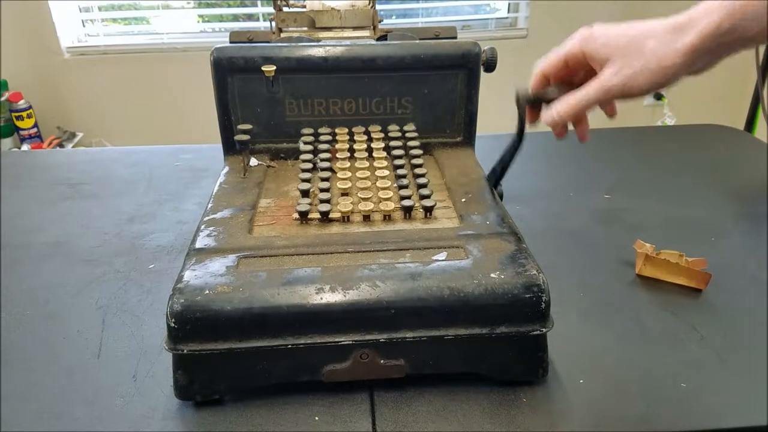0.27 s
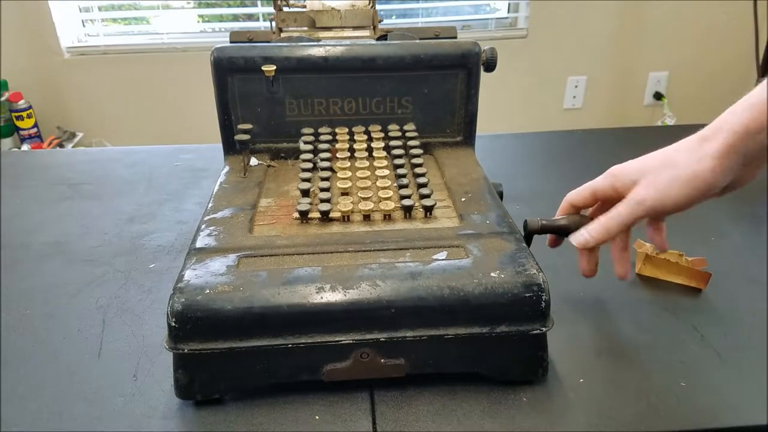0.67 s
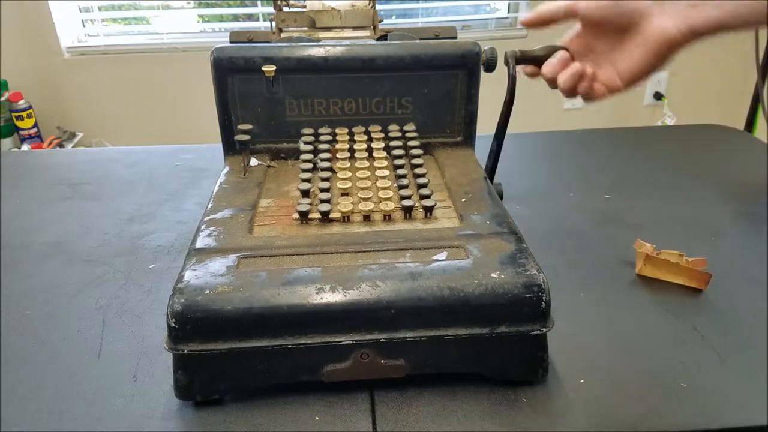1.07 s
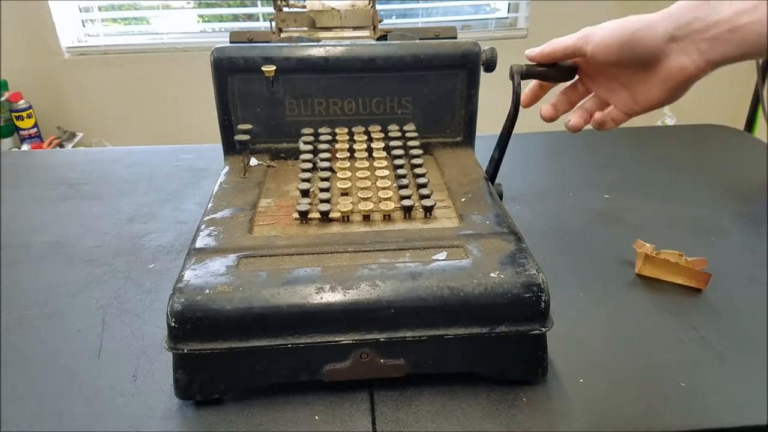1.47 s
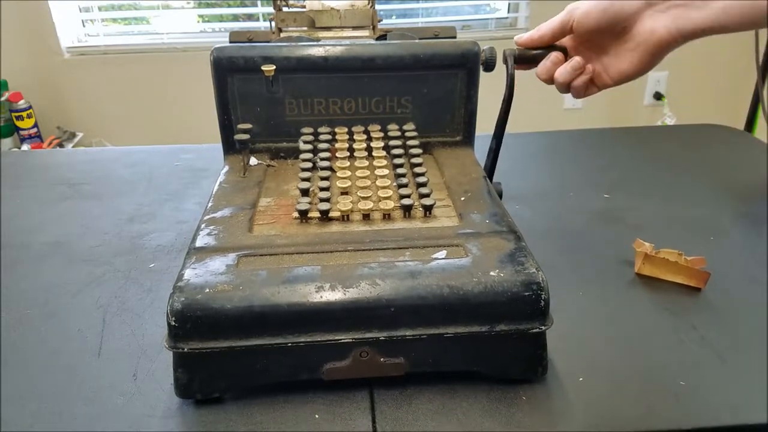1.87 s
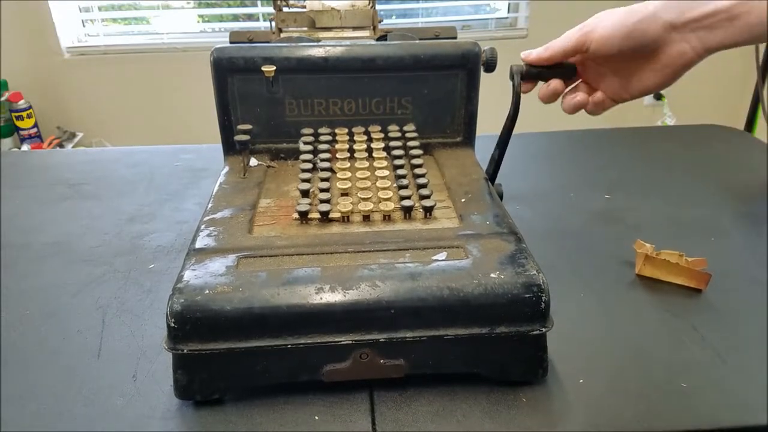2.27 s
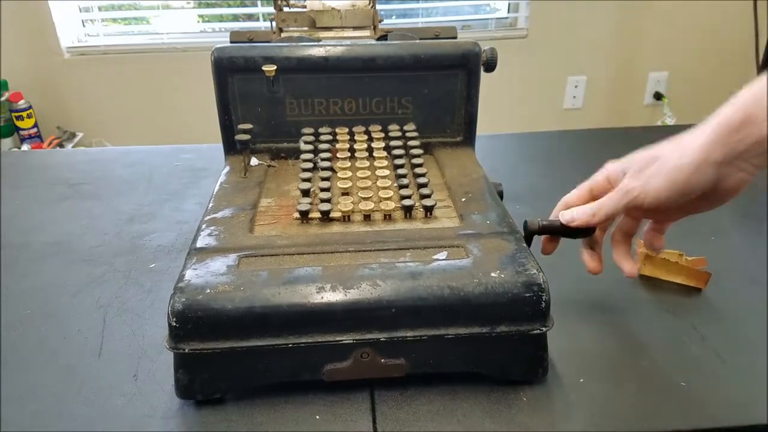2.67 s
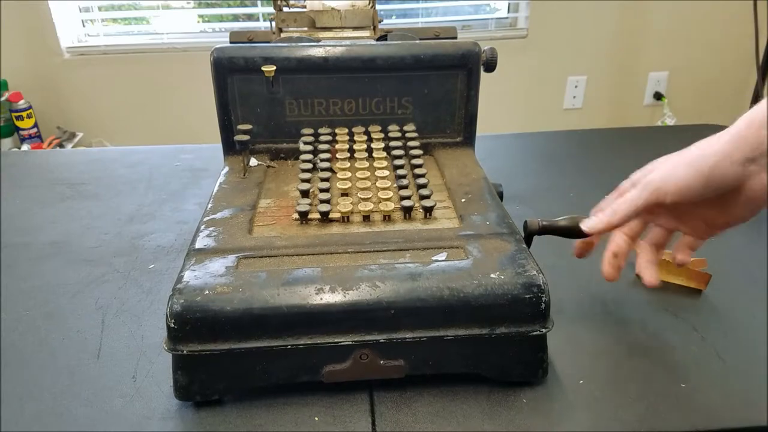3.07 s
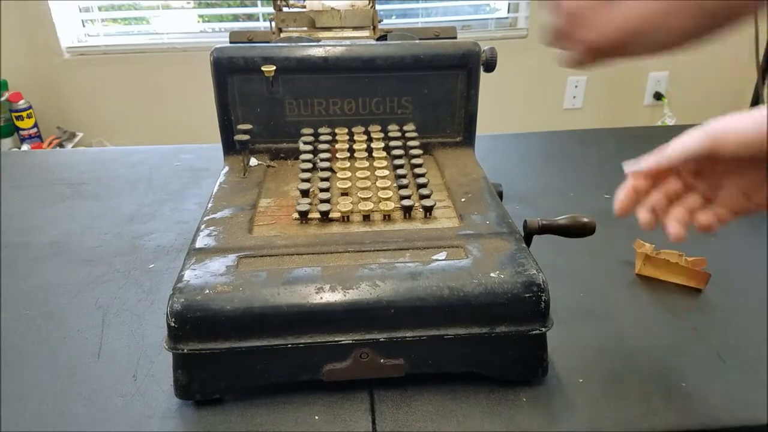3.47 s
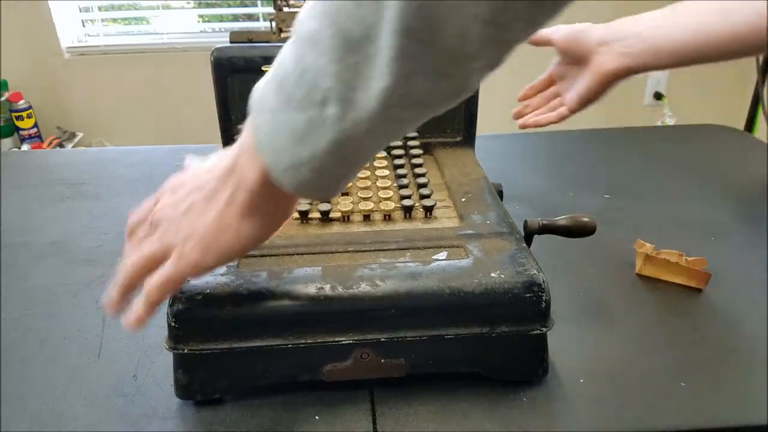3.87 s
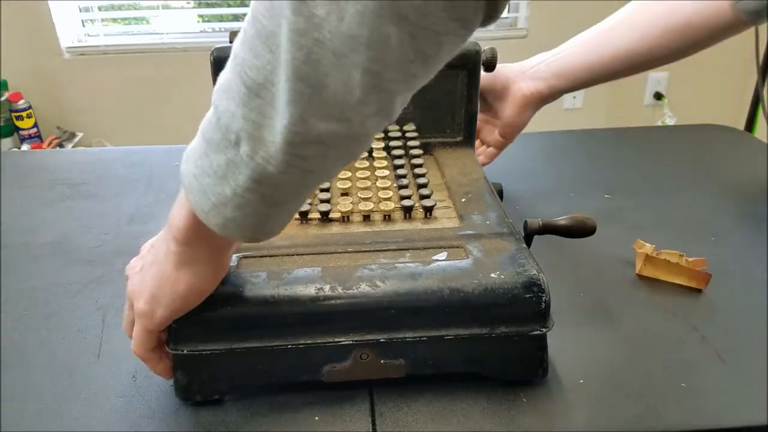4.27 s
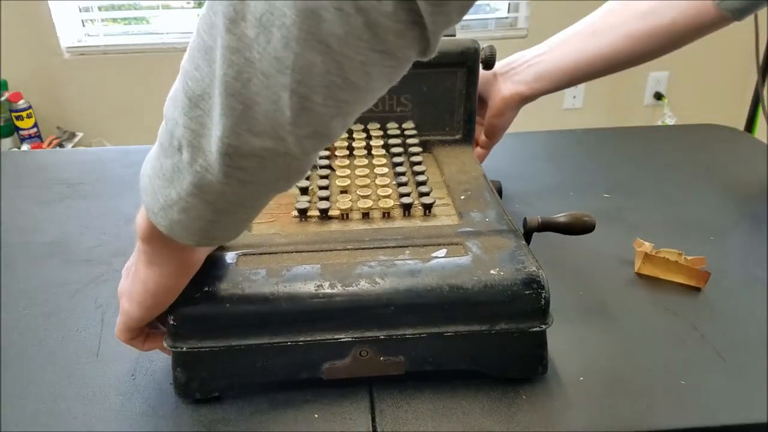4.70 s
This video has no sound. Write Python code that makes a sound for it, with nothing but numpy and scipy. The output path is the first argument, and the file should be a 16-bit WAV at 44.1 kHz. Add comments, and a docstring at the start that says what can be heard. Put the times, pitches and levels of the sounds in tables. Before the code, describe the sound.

Close stereo view of a heavy old adding machine on a table in a bare, lively room. Its handle is pulled: clicks, a hard metallic slam with a rattling rebound, a lesser clunk on return, scattered pawl clicks, then a second sharp slam with ringing springs. After a pause, hands nudge the case with dull bumps, gritty cracks and a brief scrape.

```python
"""Clacks, two hard knocks, ringing springs and a faint rattle, then soft bumps and scrapes in a bare room.
The handle of an old mechanical adding machine is pulled twice on a table, then two hands nudge the case.
Each blow is a filtered click, blurred by a burst of noise that stands for many tiny contacts.
The blows ring the steel frame and the room; springs are clusters of sines and rubbing is filtered random slips.
Behind it lie air noise, low hums and a drone that swells between the pulls."""
import sys
import numpy as np
from scipy import signal
from scipy.fft import rfft, irfft
from scipy.io import wavfile

SR = 44100
rng = np.random.default_rng(int(sys.argv[2]) if len(sys.argv) > 2 else 0)


def to_wav(s):
    """Save 16-bit WAV."""
    ch = np.atleast_2d(s).T  # columns
    pcm = np.round(np.clip(ch, -1, 1) * 32767)  # PCM
    wavfile.write(sys.argv[1], SR, pcm.astype(np.int16))


N = 213419
TIME = np.arange(N) / SR   # seconds

# The mechanism slams into a stop. Each row: start in seconds, clack level in dB, top pitch of the clack in Hz,
# case knock in dB, steel tick in dB, table thump at its strongest in dB, chatter time scale in seconds,
# first rebound against the clack in dB.
SLAMS = [(0.441, 17.5, 2730, 23, 8.5, 19, 0.014, -10), (1.0013, 6.5, 2370, 12.5, -6.5, 5, 0.007, -15.5),
         (2.627, 15, 2650, 17.5, 7.5, 12.5, 0.005, -15.5)]
# Pawls and levers drop as the handle travels. Each row: start in seconds, clack level in dB, top pitch in Hz,
# case knock in dB, chatter time scale in seconds.
PAWLS = [(0.008, -6.5, 2050, 13, 0.0073), (0.215, -2.5, 2440, 11.5, 0.012), (0.319, -19.5, 1800, 8, 0.0034),
         (0.4179, -15, 2690, -16, 0.061), (0.8253, 0, 2570, 14.5, 0.0069), (0.888, -17, 1730, 4, 0.013),
         (1.079, -2.5, 2615, 1, 0.0055), (1.095, -11, 2200, 9, 0.0022), (1.336, 3, 2145, -3, 0.0075),
         (1.6815, -5.5, 2130, 9.5, 0.0057), (1.8685, -19, 1450, -6, 0.0022),
         (1.9225, -10, 1180, -28, 0.0013), (2.127, -30, 700, 3, 0.0044), (2.2494, -4.5, 2370, 3, 0.0075),
         (2.525, -19.5, 2150, 1, 0.023), (2.562, -18.5, 2230, -2, 0.012)]
# Hands bump and rock the case. Each row: start in seconds, clack level in dB, top pitch in Hz,
# case knock in dB, table thump in dB, chatter time scale in seconds.
BUMPS = [(4.091, -10, 1330, -7.5, -10.5, 0.05), (4.294, -12, 1940, 8, -1, 0.015),
         (4.344, -14, 950, -7, -15, 0.005), (4.460, -10, 2340, 9, 7, 0.031),
         (4.648, -19.5, 1990, 0.5, 3, 0.0066), (4.712, -39, 1530, -13, -9, 0.004),
         (4.782, -11.5, 1230, -21, -4, 0.0035)]
# Grit cracks under the feet. Each row: start in seconds, clack level in dB.
GRIT = [(4.446, -15), (4.484, -16), (4.506, -7), (4.53, -9), (4.543, -15), (4.552, -7.5), (4.561, -19),
        (4.7751, -18)]
# Colour of steel on steel. Each row: pitch in Hz, level in dB.
STEEL_COLOUR = [(1500, -13), (3000, 5), (4300, -1.5), (5600, -8.5), (6900, -4.5), (8500, -11),
                (10000, -14.5), (11800, -12.5), (14000, -9), (16000, -9)]
# Broad resonances of the steel panels. Each row: pitch in Hz, width in Hz, lift over the rest in dB.
PANELS = [(633, 40, -2), (788, 100, 3.5), (1370, 26, 4), (1470, 54, 1.5), (1800, 37, -1), (1932, 135, 0),
          (2340, 23, -4), (2490, 90, 4), (3030, 24, 1.5), (3310, 230, 0.5), (4370, 110, 3.5),
          (4800, 110, 4), (6340, 260, 4.5), (6900, 86, 5), (8330, 420, 5.5), (9680, 200, 9.5),
          (11170, 1500, 8), (12250, 300, 8), (14500, 150, 2.5)]
# Springs and levers left ringing. Each row: rough start in seconds (the nearest blow sets it off), middle pitch
# in Hz, reach of the cluster to either side in Hz, level in dB, time to fall by 60 dB in seconds.
SPRINGS = [(0.441, 2064, 220, -17, 0.032), (0.441, 6860, 120, -46.5, 0.55), (1, 1652, 145, -36.5, 0.36),
           (1.336, 1790, 110, -54, 0.99), (2.247, 2430, 375.9, -56, 0.27), (2.627, 2245, 420, -21, .045),
           (2.627, 2294, 181, -32.5, 0.6), (2.628, 6900, 300, -49.5, 0.61), (2.626, 8500, 200, -40.5, 0.54),
           (2.627, 12300, 200, -46.5, 0.27), (4.091, 4650, 1097, -65, 0.79)]
# Ringing modes of the case and frame. Each row: pitch in Hz, level among the modes in dB,
# time to fall by 60 dB in seconds.
FRAME_MODES = [(146.5, -9.5, 0.83), (222, 6, 0.6), (248, 0.5, 0.88), (293.9, 2.5, 0.27), (331, 2, 0.34),
               (383.5, -14, .55), (421.7, 1, 0.5), (423.3, -7, .55), (481.5, -5.5, 0.21), (527, -1, 0.54),
               (592, 0, 0.22), (676, -1, 0.63), (727, -2.5, 0.7), (779.6, 1.5, 0.4), (896, -1, 0.48),
               (1209, -2.5, 0.51), (1375, -3, 0.78), (1342, -12.5, 0.98), (1482, -6, 0.87),
               (1668, -2, 0.25), (1740, -16, .6), (2080, -3, 0.2), (2040, -16, 0.67), (2380, -11, .5),
               (2415, -9, 0.59), (2718, -2, .6), (2798, -1, 0.27), (3190, -10.5, 0.77), (3480, -9.5, 1)]
# The linkage moves. Each row: start in seconds, length in seconds, level before the mix in dB.
MOVES = [(0.02, 0.032, -53), (0.26, 0.26, -56), (0.833, 0.25, -49.5), (2.16, 0.57, -59), (4.12, 0.24, -57)]
# How fast the room dies. Each row: pitch in Hz, time to fall by 60 dB in seconds
# (room() lets no band last longer than 1400 Hz does).
ROOM_T60 = [(100, 0.6), (300, 0.88), (700, 0.96), (1500, 0.89), (3000, 0.84), (6000, 0.74), (10000, 0.52),
            (16000, 0.28)]
# Colour of the room's echoes. Each row: pitch in Hz, level in dB.
ROOM_COLOUR = [(60, -4.5), (150, 8.5), (400, -0.5), (800, -1.5), (1400, -1.5), (2300, -6.5), (4000, -2.5),
               (8000, 0), (15000, -3)]
# Stereo width. Each row: pitch in Hz, left-right difference against the middle in dB.
WIDTH = [(80, -22.5), (160, -15.5), (300, -13), (550, -5), (1000, -1), (3000, 0.5), (14000, -0.5)]
# Colour of the air noise. Each row: pitch in Hz, relative level in dB.
AIR_COLOUR = [(25, -34.5), (55, -1), (90, -3), (150, 3), (240, -5.5), (330, -9), (420, -5.5), (600, -14),
              (1500, -18), (2500, -23.5), (5000, -31.5), (10000, -36), (12500, -31), (15500, -28.5)]
# Wavering low hums. Each row: pitch in Hz, width of each of two resonances in Hz, level in dB.
HUMS = [(97.6, 11, -66), (156.7, 12, -68), (266.4, 12, -71.5)]

SLAM_SHARE_DB = -1.5   # share passed into frame and room
# Loose parts rebound after a slam, at ever longer gaps.
REBOUND_S, REBOUND_STRETCH, REBOUND_CHATTER_S, REBOUND_SHARE_DB = 0.03, 1.13, 0.012, -0.5
REBOUND_CLACK_LOSS_DB, REBOUND_KNOCK_LOSS_DB = 2, 5   # per rebound
REBOUND_TICK_DB = -9.5   # rebounds are softer contacts
# The rocked case lands hardest on the table this long after a slam.
LANDING_S, LANDING_SLOPE_DB_PER_S = 0.063, 132
# The brighter the clack, the more steel tick.
PAWL_TICK_DB, TICK_DB_PER_OCTAVE, BRIGHT_HZ = -28, 15, 2400
PAWL_THUMP_DB = -14   # against the knock
# Longer chatter shakes more of the frame.
PAWL_SHARE_DB, SHARE_DB_PER_DOUBLING, USUAL_CHATTER_S = -1, 3, 0.0082
TICK_DULLING = 0.23   # share of a weak tick's lost level by which its top pitch falls
KNOCK_LAG_S = 0.003957   # the case answers just after the lever
BUMP_TICK_DB, BUMP_SHARE_DB = -17.5, 1.8   # tick against the clack; share into frame and room
GRIT_TOP_HZ, GRIT_CHATTER_S, GRIT_SHARE_DB = 2420, 0.0022, -6
GRIT_KNOCK_DB, GRIT_TICK_DB, GRIT_THUMP_DB = 0, -8, 7   # against the crack
# The feet judder after a bump; level against its knock.
JUDDER_DB, JUDDER_HOLD_S, JUDDER_RELEASE_S = -53, 0.032, 0.076
MOVE_ATTACK_S, MOVE_RELEASE_S = 0.028, 0.5
SLIDE_AT_S, SLIDE_LENGTH_S, SLIDE_DB, SLIDE_ATTACK_S, SLIDE_RELEASE_S = 4.49, 0.091, -46, 0.07, 0.06
AIR_DB = -60.5
# A low drone swells between the pulls and sinks back.
DRONE_PEAK_S, DRONE_DB, DRONE_REST_DB = 1.76, -56.5, -82
DRONE_RISE_DB_PER_S, DRONE_FALL_DB_PER_S = 17.5, 22
CUTOFF_HZ = 15750


def slam_blows(count=4):
    """A slam and its dying run of rebounds; the table thump builds until the case lands."""
    for s, clack_db, top_hz, knock_db, tick_db, thump_db, seconds, rebound_db in SLAMS:
        first_thump_db = thump_db - LANDING_SLOPE_DB_PER_S * LANDING_S
        yield s, clack_db, top_hz, knock_db, tick_db, first_thump_db, seconds, SLAM_SHARE_DB
        ages = np.cumsum(REBOUND_S * REBOUND_STRETCH ** np.arange(count))
        for k, age in enumerate(ages):
            fall_db = rebound_db - REBOUND_CLACK_LOSS_DB * k
            weaker_knock_db = knock_db - REBOUND_KNOCK_LOSS_DB * (k + 1)
            softer_tick_db = tick_db + fall_db + REBOUND_TICK_DB
            landing_db = thump_db - LANDING_SLOPE_DB_PER_S * abs(age - LANDING_S)
            yield (s + age, clack_db + fall_db, top_hz, weaker_knock_db, softer_tick_db,
                   landing_db, REBOUND_CHATTER_S, REBOUND_SHARE_DB)


def pawl_blows():
    """Light single contacts: the tick follows brightness, the thump follows the knock."""
    for s, clack_db, top_hz, knock_db, seconds in PAWLS:
        tick_db = PAWL_TICK_DB + TICK_DB_PER_OCTAVE * np.log2(top_hz / BRIGHT_HZ)
        share_db = PAWL_SHARE_DB + SHARE_DB_PER_DOUBLING * np.log2(seconds / USUAL_CHATTER_S)
        yield s, clack_db, top_hz, knock_db, tick_db, knock_db + PAWL_THUMP_DB, seconds, share_db


def nudge_blows():
    """Soft bumps of the hands and short cracks of grit."""
    for s, clack_db, top_hz, knock_db, thump_db, seconds in BUMPS:
        yield s, clack_db, top_hz, knock_db, clack_db + BUMP_TICK_DB, thump_db, seconds, BUMP_SHARE_DB
    for s, db in GRIT:
        yield (s, db, GRIT_TOP_HZ, db + GRIT_KNOCK_DB, db + GRIT_TICK_DB, db + GRIT_THUMP_DB,
               GRIT_CHATTER_S, GRIT_SHARE_DB)


def lever(click, top_hz, ring_db=-4):
    """A struck lever: stiffer parts are brighter and thinner, and ring briefly just under their top pitch."""
    band = cut(cut(click, top_hz, "low", order=5), 0.13 * top_hz, "high")
    return from_db(-1.5) * band + from_db(ring_db) * resonate(band, 0.81 * top_hz, 0.23 * top_hz)


def hollow_case(click):
    """Two coupled panels in a row: the thunk swells for a cycle."""
    return resonate(resonate(click, hz=474, width_hz=290), hz=367, width_hz=182)


def table_top(click, overtone_db=-7):
    """A struck table top thumps in a low mode and a weaker second one."""
    low_mode = cut(cut(resonate(click, hz=135, width_hz=45), 170, "low"), 95, "high")
    second_mode = resonate(resonate(click, hz=277, width_hz=88), hz=279, width_hz=110)
    return low_mode + from_db(overtone_db) * second_mode


def chatter(seconds, size):
    """A blow breaks into many tiny contacts that die away, made as fading noise."""
    t = TIME[:size] / max(seconds, 1e-4)
    noise = rng.standard_normal((2, size)) * (1 + t) * np.exp(-1.6 * t)
    return unit_energy(spread(even_out(noise, amount=0.57)))


def contacts(size=8192, knock_far_db=-2.5, thump_far_db=0):
    """Each contact clacks a lever, knocks the case and thumps the table; gives near sound and the push behind."""
    near, push = np.zeros((2, N)), np.zeros((1, N))
    click = signal.unit_impulse(size) + 1e-18
    hollow = hollow_case(click)
    table = table_top(click)
    tick = colour(cut(click, 2820, "high"), STEEL_COLOUR)
    blows = [*slam_blows(), *pawl_blows(), *nudge_blows()]
    for s, clack_db, top_hz, knock_db, tick_db, thump_db, seconds, share_db in blows:
        clack = from_db(clack_db) * lever(click, top_hz)
        # a soft contact has a duller tick
        tick_top_hz = 8.2 * top_hz * from_db(TICK_DULLING * min(tick_db, 0))
        steel = from_db(tick_db) * cut(tick, tick_top_hz, "low", order=1)
        knock = from_db(knock_db) * hollow
        thump = from_db(thump_db) * table
        bright = convolve(clack, chatter(seconds, size)) + convolve(steel, chatter(0.5 * seconds, size))
        # the heavy case answers the blow partly as a whole, with one pitched thunk
        thunk = from_db(-6.0) * knock + from_db(-1.5) * convolve(knock, chatter(seconds, size))
        far_thunk = from_db(knock_far_db) * knock + from_db(thump_far_db) * thump
        share = from_db(share_db)
        add(near, s, bright)
        add(push, s, share * (clack + steel))
        add(near, s + KNOCK_LAG_S, thunk + from_db(-0.5) * thump)
        add(push, s + KNOCK_LAG_S, share * np.atleast_2d(far_thunk))
    return panels(near), panels(push)


def panels(x, between_db=-1.5):
    """The steel panels lift their own pitches and pass less in between."""
    freqs = np.linspace(20, SR / 2, 4096)
    lift = sum(db / (1 + (2 * (freqs - hz) / width_hz) ** 2) for hz, width_hz, db in PANELS)
    return colour(x, np.column_stack([freqs, between_db + lift]))


def springs(count=30):
    """A spring or a row of levers rings in a cluster of close, beating modes."""
    out, t = np.zeros((2, N)), TIME[:SR]
    blows = np.array([row[0] for row in SLAMS + PAWLS + BUMPS])
    for rough_s, hz, width_hz, db, t60 in SPRINGS:
        s = blows[np.argmin(np.abs(blows - rough_s))]   # set off by the nearest blow
        partials = hz + width_hz * (rng.random((count, 1)) + rng.random((count, 1)) - 1)
        phases = rng.random((2, count, 1))
        cluster = np.sin(2 * np.pi * (partials * t + phases)).sum(axis=1) / np.sqrt(count / 2)
        add(out, s, from_db(db - 60 * t / t60) * cluster)
    return out


def frame():
    """Response of the ringing case and frame: a sum of dying sines."""
    t, out = TIME[:SR], 0
    for hz, db, t60 in FRAME_MODES:
        tone = np.sin(2 * np.pi * (hz * t + rng.random((2, 1))))
        out = out + from_db(db) * unit_energy(tone * np.exp(-np.log(1000) * t / t60))
    return spread(out)


def friction(per_s, uneven_db):
    """Random slips of uneven size; rms 1."""
    happens = rng.random(N) < per_s / SR
    slips = happens * rng.standard_normal(N) * from_db(uneven_db * rng.standard_normal(N))
    return slips / slips.std()


def rubbing():
    """The linkage grumbles through the case; the nudged case rasps and its feet judder on the table."""
    slips = friction(per_s=630, uneven_db=5.5)
    grumble = resonate(cut(slips, 740, "low"), hz=385, width_hz=264)
    linkage = grumble + from_db(-17) * cut(slips, [500, 2500], "band", order=3)
    grit = friction(per_s=1600, uneven_db=4.0)
    scrape = cut(resonate(grit, hz=1730, width_hz=500), 940, "high", order=4)
    rasp = scrape + from_db(-15.5) * cut(grit, 14000, "high")
    moving = sum(swell(s, length, db, MOVE_ATTACK_S, MOVE_RELEASE_S) for s, length, db in MOVES)
    sliding = swell(SLIDE_AT_S, SLIDE_LENGTH_S, SLIDE_DB, SLIDE_ATTACK_S, SLIDE_RELEASE_S)
    rocking = sum(swell(s, JUDDER_HOLD_S, knock_db + JUDDER_DB, KNOCK_LAG_S, JUDDER_RELEASE_S)
                  for s, _, _, knock_db, _, _ in BUMPS)
    judder = hum(hz=250, width_hz=67)
    return moving * linkage / linkage.std() + sliding * rasp / rasp.std() + rocking * judder


def room(build_s=0.0016, patchy_db=-1.0):
    """Response of the room: uneven reflections thicken, then die away, fastest at the top and bottom."""
    t, out = TIME[:SR], 0
    fade = np.exp(-np.log(1000) * t / at_hz(ROOM_T60, 1400))
    coarse_t = t[::128]
    strengths = from_db(patchy_db * np.interp(t, coarse_t, rng.standard_normal(len(coarse_t))))
    reflections = even_out(rng.standard_normal((2, SR)) * fade, amount=0.084) * strengths
    spectrum, freqs = rfft(reflections), np.fft.rfftfreq(SR, 1 / SR)
    edges = np.geomspace(40, 20000, 17)
    for low, high in zip(edges, edges[1:]):
        band = irfft(spectrum * ((freqs >= low) & (freqs < high)), SR)
        t60 = at_hz(ROOM_T60, np.sqrt(low * high))
        extra_loss = np.minimum(np.exp(-np.log(1000) * t / t60) / fade, 1)
        out = out + band * extra_loss
    build_up = 1 - np.exp(-(t / build_s) ** 2)
    fade_out = np.minimum(4 * (1 - t), 1)
    return colour(unit_energy(spread(out * build_up * fade_out)), ROOM_COLOUR)


def hum(hz, width_hz):
    """A wavering low tone, made by noise through two resonances; rms 1."""
    noise = rng.standard_normal(N + SR)
    tone = resonate(resonate(noise, hz, width_hz), hz, width_hz)[SR:]   # skip the build-up
    return tone / tone.std()


def drone(waver_hz=1.5):
    """A low tone of unsteady pitch that swells and sinks back to a faint rest level."""
    pitch_hz = 78 + waver_hz * hum(hz=2.6, width_hz=4)
    tone = np.sqrt(2) * np.sin(2 * np.pi * np.cumsum(pitch_hz) / SR)
    sunk_db = np.maximum(DRONE_RISE_DB_PER_S * (DRONE_PEAK_S - TIME),
                         DRONE_FALL_DB_PER_S * (TIME - DRONE_PEAK_S))
    return (from_db(DRONE_DB - sunk_db) + from_db(DRONE_REST_DB)) * tone


def room_tone():
    """Steady coloured air noise with a few low hums and the drone."""
    air = colour(spread(rng.standard_normal((2, N + SR))), AIR_COLOUR)[:, SR:]
    hums = sum(from_db(db) * hum(hz, width_hz) for hz, width_hz, db in HUMS)
    return from_db(AIR_DB) * air / air.std() + hums + drone()


def from_db(db):
    """Decibels to gain."""
    return 10 ** (np.asarray(db) / 20)


def unit_energy(x):
    """Scale to the energy of a unit click, averaged over the channels."""
    return x / np.sqrt(np.mean(np.sum(x ** 2, axis=-1)) + 1e-20)


def at_hz(points, hz):
    """Read a table on a log-frequency axis."""
    freqs, values = np.transpose(points)
    return np.interp(np.log(np.maximum(hz, 1)), np.log(freqs), values)


def colour(x, spectrum):
    """Causal (minimum-phase) filter that follows (Hz, dB) points."""
    size = 8192
    gains = from_db(at_hz(spectrum, np.fft.rfftfreq(size, 1 / SR)))
    cepstrum = irfft(np.log(gains))
    # folding the cepstrum forward in time makes the filter causal
    cepstrum[1:size // 2] *= 2
    cepstrum[size // 2 + 1:] = 0
    return convolve(x, irfft(np.exp(rfft(cepstrum))))


def convolve(x, response):
    """Pass x through a response, keeping its length."""
    return signal.fftconvolve(np.atleast_2d(x), np.atleast_2d(response), axes=-1)[:, :x.shape[-1]]


def cut(x, hz, kind, order=2):
    """Butterworth filter."""
    safe_hz = np.clip(hz, 10, .45 * SR)
    return signal.sosfilt(signal.butter(order, safe_hz, kind, fs=SR, output="sos"), x)


def resonate(x, hz, width_hz):
    """One resonance with gain about 1 on top."""
    r = np.exp(-np.pi * width_hz / SR)
    feed = np.array([1, 0, -1]) * (1 - r * r) / 2
    feedback = [1, -2 * r * np.cos(2 * np.pi * hz / SR), r * r]
    return signal.lfilter(feed, feedback, x + 1e-18)


def spread(pair):
    """Two unrelated signals become left and right, alike in the bass and apart in the treble."""
    return pair[0] + colour(pair[1], WIDTH) * [[1], [-1]]


def even_out(x, amount):
    """Flatten the chance peaks and dips in the spectrum of a decaying noise."""
    size = x.shape[-1]
    spectrum = rfft(x, 2 * size)
    return irfft(spectrum / (np.abs(spectrum) + 1e-9) ** np.clip(amount, 0, 1))[:, :size]


def swell(start, length, db, attack_s, release_s):
    """Gain over time: attack, hold, release; the slopes cover 20 dB in their times."""
    early = np.maximum(start - TIME, 0)
    late = np.maximum(TIME - start - length, 0)
    return from_db(db - 20 * (early / attack_s + late / release_s))


def add(track, s, sound):
    """Mix a sound in at time s."""
    start = int(np.clip(round(s * SR), 0, N - 1))
    track[:, start:start + sound.shape[-1]] += sound[:, :N - start]


def scene():
    """The machine stands a little to the right; its blows ring the frame and fill the room."""
    near, push = contacts()
    rub, echoes = rubbing(), room()
    machine = near + springs() + from_db(-4.5) * rub
    machine = machine + from_db(-23.0) * convolve(push, frame())
    machine = machine + from_db(2.5) * convolve(push, echoes) + from_db(-2.5) * convolve(rub, echoes)
    bass = cut(machine, 220, "low", order=1)   # long waves reach both sides equally
    return bass + (machine - bass) * from_db([[-1.6], [1.1]]) + room_tone()


def record(dry):
    """The deepest bass and the top are cut."""
    top_cut = signal.ellip(10, .2, 80, CUTOFF_HZ, fs=SR, output="sos")
    return signal.sosfilt(top_cut, cut(dry, 22, "high"))


dry = scene()
out = record(dry)
to_wav(out)
```